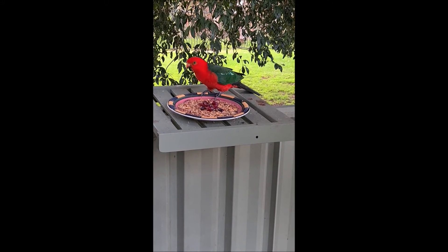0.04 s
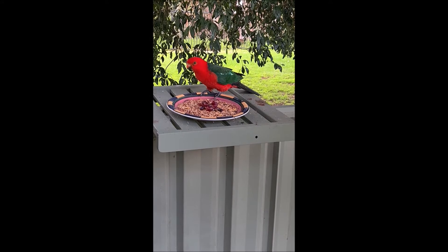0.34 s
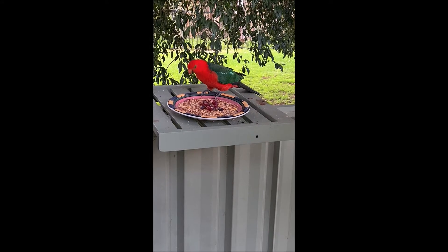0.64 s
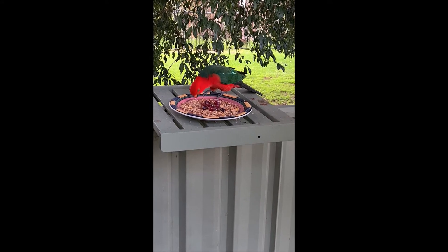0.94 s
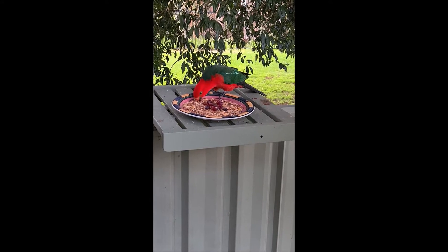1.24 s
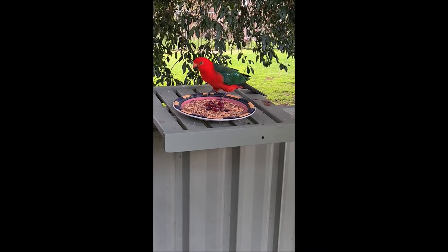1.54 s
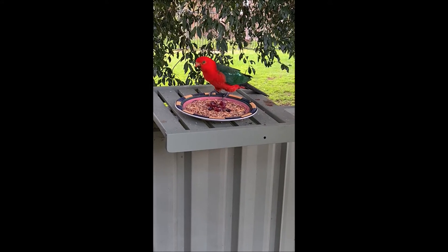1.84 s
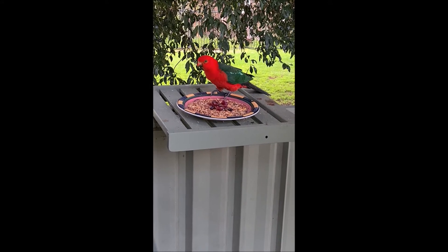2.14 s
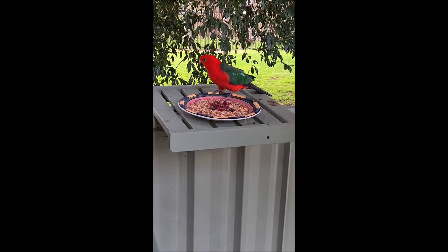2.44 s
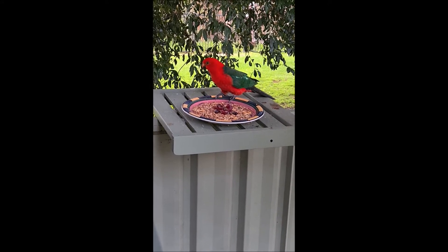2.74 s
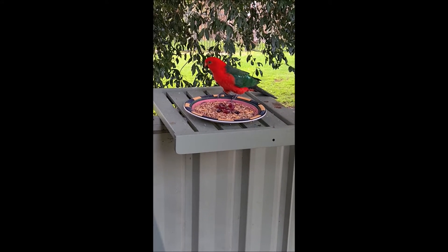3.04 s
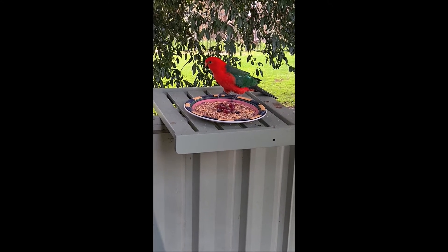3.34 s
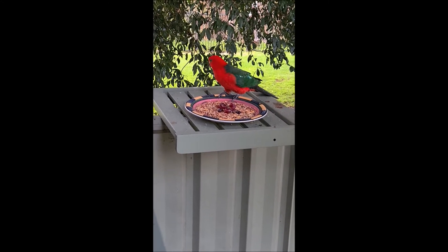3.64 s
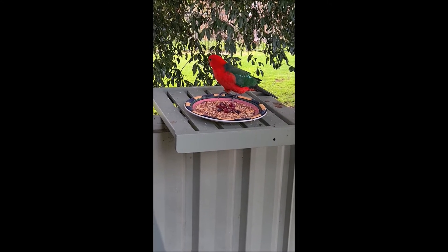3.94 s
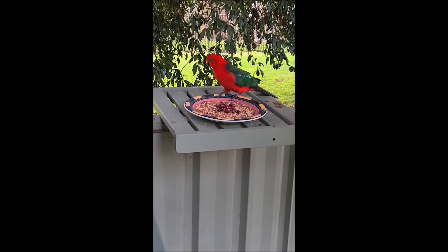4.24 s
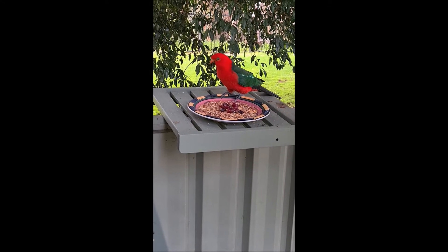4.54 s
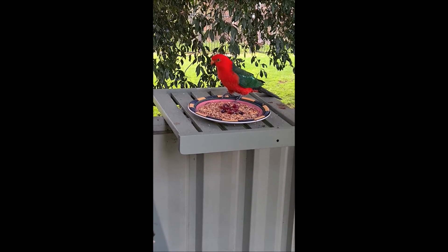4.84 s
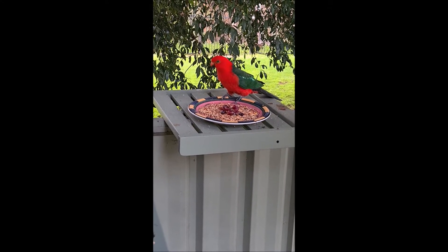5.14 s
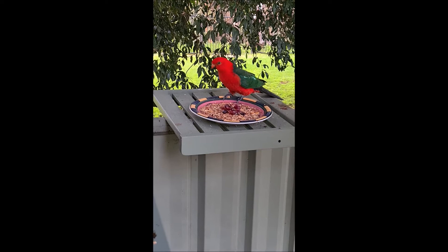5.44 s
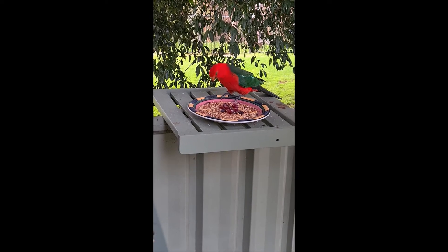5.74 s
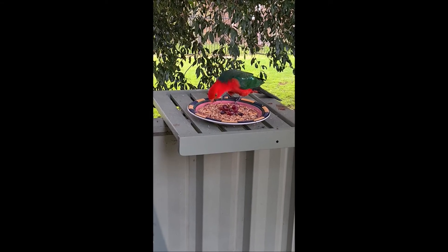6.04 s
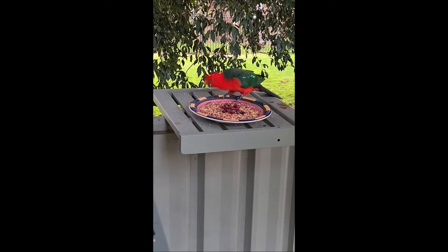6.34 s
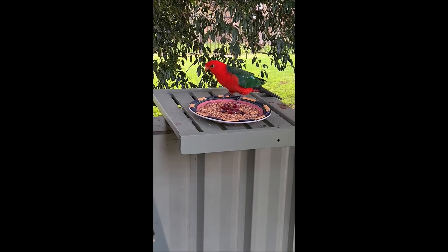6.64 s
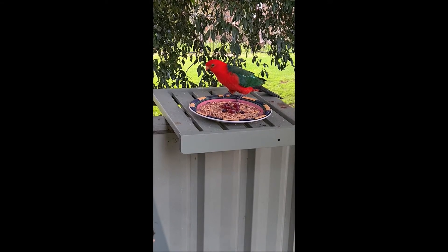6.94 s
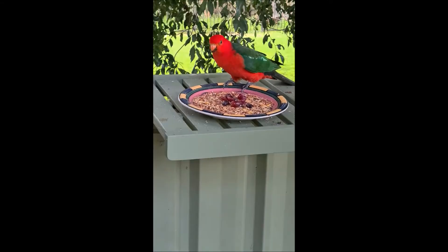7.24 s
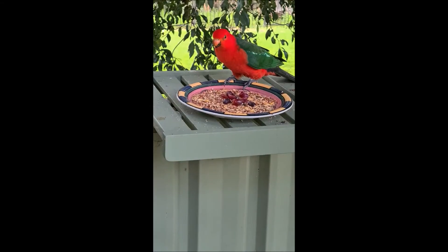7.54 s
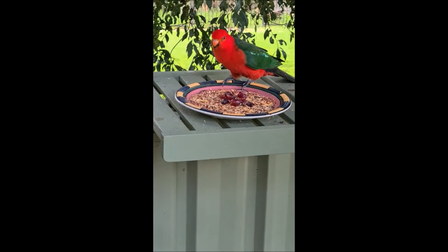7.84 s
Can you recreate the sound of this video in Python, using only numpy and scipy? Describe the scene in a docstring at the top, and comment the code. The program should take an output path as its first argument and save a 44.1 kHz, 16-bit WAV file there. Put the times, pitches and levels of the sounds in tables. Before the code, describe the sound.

A parrot cracks seed with sharp ticks while a few knocks ring on a metal roof and garden birds trill and chirp.

```python
"""A parrot on a veranda

A parrot cracks seed at a dish: each brittle fracture is a sharp tick, among a few rustles.
Something knocks on the sheet-metal roof four times, each weaker and duller, exciting its modes.
In the garden trees, the vibrating membranes of birds trill, screech and pip over a soft outdoor wash.
A dry tap and a few low bumps sound close to the microphone."""
import sys
import numpy as np
from scipy import signal
from scipy.fft import rfft, irfft, next_fast_len
from scipy.io import wavfile
from scipy.ndimage import uniform_filter1d

SR = 44100
rng = np.random.default_rng(int(sys.argv[2]) if len(sys.argv) > 2 else 0)


def to_wav(s):
    """Save 16-bit WAV."""
    ch = np.atleast_2d(s).T  # columns
    pcm = np.round(np.clip(ch, -1, 1) * 32767)  # PCM
    wavfile.write(sys.argv[1], SR, pcm.astype(np.int16))


N = 348390

# spectrum of a woody knock: frequency_hz, level_db
WOOD_SPECTRUM = [(150, -4), (700, -6.5), (1150, 2.5), (1700, -1.5), (2700, -1), (4000, -5), (8000, -32),
                 (16000, -24)]
# reverberation of the veranda: frequency_hz, t60_s
VERANDA_DECAY = [(150, 0.58), (1000, 0.24), (2500, 0.27), (6000, 0.26), (15000, 0.21)]
# reverberation of the garden: frequency_hz, t60_s
GARDEN_DECAY = [(500, 1), (2500, 0.59), (4000, 0.53), (8000, 0.52), (15000, 0.099)]


def amp(db):
    """Amplitude ratio of a level in decibels."""
    return 10 ** (np.asarray(db) / 20)


def unit(x):
    """Normalisation to rms 1."""
    return x / np.sqrt(np.mean(x ** 2) + 1e-20)


def read(points, hz):
    """Interpolation on a log-frequency axis."""
    frequency, value = np.transpose(points)
    return np.interp(np.log(hz + 1), np.log(frequency + 1), value)


def times(length_s):
    """Sample times over a duration."""
    return np.arange(max(int(length_s * SR), 16)) / SR


def add(mix, start_s, sound):
    """Superposition of a sound on the mix."""
    part = mix[..., max(round(start_s * SR), 0):][..., :sound.shape[-1]]
    part += sound[..., :part.shape[-1]]


def noise(spectrum, size, corner_hz=np.inf):
    """Filtered noise of rms 1, falling a further 12 dB an octave above a corner."""
    hz = np.fft.rfftfreq(size, 1 / SR)
    shaped = rfft(rng.standard_normal(size)) * amp(read(spectrum, hz))
    return unit(irfft(shaped / np.hypot(1, np.square(hz / corner_hz)), size))


def wobble(size, rate_hz):
    """Random modulation: low-pass noise of rms 1."""
    return noise([(1, 0), (2, 0.014)], size, rate_hz)


def click(gain, size=2048):
    """Minimum phase gives the sharpest causal pulse of a magnitude spectrum; its energy is 1."""
    log_gain = np.log(np.maximum(np.r_[gain, gain[-2:0:-1]], 1e-5))
    pulse = np.fft.ifft(np.exp(np.conj(signal.hilbert(log_gain)))).real[:size]
    return pulse / np.linalg.norm(pulse)


def swell(t, edge):
    """Cosine-tapered envelope; edge is the share spent rising and falling."""
    return signal.windows.tukey(len(t), np.clip(edge, 0, 1))


def place(x, t60s, direct_db, wet_db, lag_samples=8):
    """Direct sound reaches the left port first; the diffuse echoes differ at each port."""
    echoes = rng.choice([-1., 1.], (2, SR)) * (rng.random((2, SR)) < 1 / 10)
    hz, t, spectra = signal.stft(echoes, SR, nperseg=256)
    decay = np.exp(-np.log(1000) * t / read(t60s, hz)[:, None])
    tail = signal.istft(spectra * decay, SR, nperseg=256)[1]
    wet = signal.fftconvolve(np.atleast_2d(x), tail / np.linalg.norm(tail[0]), axes=1)[:, :N]
    left, right = np.broadcast_to(x, (2, N))
    return amp(direct_db) * np.array([left, np.roll(right, lag_samples)]) + amp(wet_db) * wet


def voice(hz, rough, jitter=0.0764, jitter_hz=700, flutter_db=2.0, drift=0.0055):
    """Phase and amplitude of a bird's membrane; fast frequency modulation is heard as roughness."""
    shaken_hz = hz * (1 + jitter * rough * wobble(len(hz), jitter_hz) + drift * wobble(len(hz), 33.6))
    strength = np.sqrt(2) * unit(amp(flutter_db * wobble(len(hz), 27)))
    return 2 * np.pi * np.cumsum(shaken_hz) / SR, strength


def tone(hz, rough, octave_db=-33):
    """A whistle: a fundamental with a faint second harmonic."""
    phase, strength = voice(hz, rough)
    return strength * (np.sin(phase) + amp(octave_db) * np.sin(2 * phase))


def arch(t, start, middle, end):
    """A parabolic pitch contour through three points."""
    return np.polyval(np.polyfit([0, 1 / 2, 1], [start, middle, end], 2), t / t[-1])


def glide(t, hz, octaves, arch_octaves=.035):
    """A slightly arched exponential sweep, passing hz at mid-call."""
    from_middle = t / t[-1] - 1 / 2
    return hz * 2 ** (octaves * from_middle - arch_octaves * (2 * from_middle) ** 2)


def chirp(length, hz, octaves, db, rough):
    """A swept tone that swells and fades."""
    t = times(length)
    return amp(db) * swell(t, 0.23) * tone(glide(t, hz, octaves), rough, octave_db=-22.5)


def air(level_db=-50, swell_db=1.57, swell_hz=0.59, patch_db=2.0):
    """Distant outdoor wash: drifting noise, coherent between the ports at long wavelengths."""
    # broad spectrum: frequency_hz, level_db
    spectrum = [(12, -31), (20, -6.5), (60, 0.5), (150, -11), (347, -9.5), (472, -14), (698, -7),
                (897, -13), (1120, -10), (1570, -20.5), (4060, -27), (7310, -36), (8890, -46.5),
                (12400, -43), (16000, -48)]
    # spectral peaks: centre_hz, width_hz, gain_db
    peaks = [(36.6, 27, 6), (648, 320, 2), (1060, 500, 1.5), (2030, 960, 6)]
    # likeness of the two ports: frequency_hz, coherence
    coherence = [(30, 1), (100, 0.99), (250, 0.96), (700, 0.69), (1200, 0.68), (3000, 0.058), (16000, 0.05)]
    # phase lead of the left port: frequency_hz, lead_rad
    lead = [(20, 0), (300, 0.55), (750, 0.56), (1200, 1.68), (2000, 2.5), (4000, 7), (16000, 0.5)]
    frames, hz = N // 512 + 5, np.fft.rfftfreq(2048, 1 / SR)
    draws = rng.standard_normal((5, frames, len(hz)))
    left, independent = draws[0] + 1j * draws[1], draws[2] + 1j * draws[3]
    patches = unit(uniform_filter1d(uniform_filter1d(draws[4], size=9, axis=0), size=16, axis=1))
    shared = np.clip(read(coherence, hz), -1, 1)
    right = (shared * left + np.sqrt(1 - shared ** 2) * independent) * np.exp(-1j * read(lead, hz))
    peaks_db = sum(db / (1 + (2 * (hz - centre) / width) ** 2) for centre, width, db in peaks)
    spectra = np.array([left, right]) * amp(read(spectrum, hz) + peaks_db + patch_db * patches)
    wash = signal.istft(spectra, nperseg=2048, noverlap=1536, time_axis=1, freq_axis=2)[1][:, :N]
    midband = signal.sosfilt(signal.butter(2, [300, 1400], "band", fs=SR, output="sos"), wash.mean(0))
    return wash / midband.std() * amp(level_db + swell_db * wobble(N, swell_hz))


def screeches():
    """Source and filter: the parrot's throat shapes the overtones of a falling call."""
    # screeches: start_s, length_s, pitch_hz, glide_octaves, fundamental_db, overtones_db, roughness
    calls = [(0, 0.25, 2245, -0.2, -54.5, -59, 0.88), (.489, 0.14, 2200, -0.075, -57.5, -52, 1.09),
             (0.877, .13, 1960, -0.024, -53, -50, 0.24), (1.528, 0.12, 2005, -.14, -58, -65.5, 0.14),
             (3.278, 0.17, 2188, -0.28, -55, -49.5, 0.35), (5.397, 0.073, 1942, -0.22, -43, -60, 0),
             (5.61, .12, 2180, -.19, -50.5, -65, .25), (5.726, 0.045, 1968, -.23, -44, -65, .2),
             (6.277, 0.069, 1640, -0.17, -51.5, -87, 0.04), (6.602, 0.21, 2133, -0.18, -57.5, -53, 0.5)]
    # response of the throat: frequency_hz, gain_db
    throat = [(3000, -15), (4300, -0.5), (6300, -0.5), (8500, -20), (13000, -22)]
    out = np.zeros(N)
    for s, length, hz, octaves, db, overtones_db, rough in calls:
        t = times(length)
        pitch = glide(t, hz, octaves)
        phase, strength = voice(pitch, rough)
        overtones = sum(amp(read(throat, k * pitch)) * np.sin(k * phase) for k in range(2, 7))
        harmonics = amp(db) * np.sin(phase) + amp(overtones_db) * overtones
        add(out, s, strength * swell(t, 0.28) * harmonics)
    return out


def chatter(count=20, centre_hz=2900, spread_octaves=.35, level_db=-63, spread_db=3):
    """Small birds further off: faint swept tones, random in onset, pitch and slope."""
    out = np.zeros(N)
    for k, (when, pitch, slide, level) in enumerate(rng.uniform(-1, 1, (count, 4))):
        s = (k + (1 + when) / 2) / count * N / SR
        hz = centre_hz * 2 ** (spread_octaves * pitch)
        add(out, s, chirp(.12, hz, .2 * slide, level_db + spread_db * level, rough=.6))
    return out


def garden_birds(whine_lower_hz=2751, lisp_hz=7140):
    """Frequency-modulated calls and squawks of band noise, scattered together by the trees."""
    # nearer chirps: start_s, length_s, pitch_hz, glide_octaves, level_db, roughness
    chirps = [(0.272, 0.049, 4770, .05, -52, .9), (1.346, 0.058, 3350, .05, -52, 1.1),
              (1.865, 0.071, 3450, .14, -49, 1), (2.668, 0.076, 5830, 0.36, -53.5, 0.73),
              (2.743, 0.068, 6130, -0.27, -41, 0.63), (2.8, .18, 5600, -.08, -59, 0.42),
              (4.771, 0.096, 3210, -.26, -48, 1.05), (5.373, 0.0455, 3420, -0.085, -48.5, .5),
              (5.374, 0.047, 6230, -0.15, -44, 0.7), (5.504, .078, 2795, -0.22, -50.5, 0.7),
              (6.095, 0.079, 4850, .03, -53.5, 0.6), (6.459, 0.25, 2466, -.1, -55.5, 1.12),
              (6.903, 0.13, 3150, -0.29, -50.5, .54), (7.113, .1, 5750, -0.054, -52.5, 0.36),
              (7.708, 0.086, 4450, -0.082, -49.5, 0.23)]
    # far low calls: start_s, length_s, pitch_hz, glide_octaves, level_db
    far_calls = [(1.076, 0.056, 721, -0.0082, -50.5), (4.098, 0.17, 765, 0.036, -51.5),
                 (4.664, .26, 724, -0.281, -53.5), (5.366, 0.13, 705, -0.04, -45.5),
                 (7.119, .13, 1123, -0.0094, -54.5)]
    # thin, hissing calls: start_s, length_s, level_db
    lisps = [(1.147, .12, -63.5), (3.667, 0.1, -55), (5.436, .13, -59.5), (7.37, 0.2, -62)]
    # harsh squawks: start_s, length_s, centre_hz, level_db
    squawks = [(5.337, 0.03, 2400, -35.5), (6.788, 0.042, 3460, -44), (7.015, 0.021, 3300, -47),
               (7.765, 0.032, 3270, -48.5)]
    # two-voiced whines: start_s, length_s, upper_pitch_hz, level_db
    whines = [(6.61, 0.19, 4540, -48), (6.859, 0.16, 4260, -45.5), (7.601, 0.131, 4350, -50.5),
              (7.856, .08, 4200, -49.5)]
    # reverberation among the trees: frequency_hz, t60_s
    tree_decay = [(500, 0.16), (2500, 0.33), (4000, 0.39), (8000, 0.3), (15000, 0.15)]
    out = screeches() + chatter()
    for s, *note in chirps:
        add(out, s, chirp(*note))
    for s, length, hz, db in whines:
        add(out, s, chirp(length, hz, 0.046, db, rough=0.246))
        add(out, s, chirp(length, whine_lower_hz, 0, db - 5, rough=0.246))
    for s, length, db in lisps:
        add(out, s, chirp(length, lisp_hz, 0, db, rough=0.95))
    for s, *note in far_calls:
        add(out, s, chirp(*note, rough=0.031))
    for s, length, hz, db in squawks:
        t = times(length)
        band = [(hz / 4, -22), (hz, 0), (hz * 1.25, -2), (hz * 2.37, -24), (hz * 5, -50)]
        add(out, s, amp(db) * swell(t, 0.39) * noise(band, len(t)))
    return place(out, tree_decay, direct_db=-6.5, wet_db=-1, lag_samples=4)


def seed_cracks(snap_hz=8000, half_width_hz=1000, snap_db=4, crumble_db=-19, crumble_s=0.00041):
    """Brittle fracture: an impulse and a short crumbling excite a bright snap and a woody knock."""
    # beak cracking seed: start_s, level_db, body_db, corner_hz
    cracks = [(0.2273, -27, -6, 18000), (.46, -52, -10, 16000), (.94, -44, -6, 12000),
              (1.155, -48.5, -9, 14000), (2.774, -38.5, -21, 8900), (4.296, -49, -15, 8000),
              (4.581, -43.5, -10, 17000), (6.8065, -25, -3.5, 16100), (7.5308, -26, -18, 7300),
              (7.6879, -40.5, -1, 8000)]
    # spectrum of a snapping husk: frequency_hz, level_db
    husk = [(500, -61), (2000, -3), (4000, -1.5), (6000, 11), (8000, 12), (10000, 4), (16000, 9)]
    # early reflections from ledge and walls: frequency_hz, t60_s
    wall_decay = [(300, 0.057), (3000, 0.073), (15000, 0.088)]
    out, hz, t = np.zeros(N), np.fft.rfftfreq(4096, 1 / SR), times(.03)
    resonance = 1 + amp(snap_db) / (1 + ((hz - snap_hz) / half_width_hz) ** 2)
    knock = click(amp(read(WOOD_SPECTRUM, hz)))
    for s, db, body_db, corner_hz in cracks:
        snap = click(amp(read(husk, hz)) * resonance / np.hypot(1, (hz / corner_hz) ** 3))
        force = (t == 0) + amp(crumble_db) * rng.standard_normal(len(t)) * np.exp(-t / crumble_s)
        add(out, s, amp(db) * signal.fftconvolve(force, snap + amp(body_db) * knock))
    early = place(out, wall_decay, direct_db=10.5, wet_db=17.5, lag_samples=6)
    return early + place(out, VERANDA_DECAY, direct_db=6, wet_db=13.5, lag_samples=6)


def rustles(grain_db=-1.5, body_db=-1.5):
    """Friction noise of feathers and leaves, made grainy by fast amplitude modulation."""
    # swishes: start_s, length_s, level_db
    swishes = [(0.233, 0.046, -55.5), (0.499, 0.22, -76), (3.209, 0.048, -55.5), (3.706, 0.042, -53.5),
               (3.833, 0.09, -44), (4.021, 0.074, -49.5), (4.125, 0.059, -50), (5.132, 0.037, -53),
               (5.992, 0.027, -60.5), (7.045, .059, -63), (7.59, .038, -60), (7.785, 0.06, -57.5)]
    # spectrum of rubbing feathers: frequency_hz, level_db
    feather = [(300, -39), (2000, -26), (5500, -6), (7000, -4), (8600, -9.5), (11000, -6.5), (16000, -10.5)]
    out = np.zeros(N)
    for s, length, db in swishes:
        t = times(length)
        hiss = noise(feather, len(t)) + amp(body_db) * noise(WOOD_SPECTRUM, len(t))
        add(out, s, amp(db) * swell(t, 0.37) * hiss * amp(grain_db * wobble(len(t), 500)))
    return place(out, VERANDA_DECAY, direct_db=1.5, wet_db=3.5)


def trills(buzz_hz=350, under_db=2, over_db=-11, flick_db=-2, octave_db=-33):
    """Biphonation: one side of the syrinx buzzes a high note while the other holds a lower one."""
    # one bird's trills: start_s, upper_db, lower_db, roughness, pitch_hz
    calls = [(0.548, -54.5, -58.5, 0.34, 4015), (1.42, -54.5, -59.5, 0.11, 3970),
             (2.291, -55, -57, 0.18, 3955), (3.22, -55, -56.5, 0.26, 3950), (4.106, -55, -57.5, 0.14, 3928),
             (4.971, -50, -52.5, 0.01, 3917), (6.002, -44.5, -53, 0.11, 3895),
             (7.079, -47.5, -52, 0.15, 3930)]
    # contour of the upper voice: time_s, pitch_ratio, level_db
    upper_contour = [(0, .985, 1), (.022, 1, 1), (.055, .993, 0), (.1, 1, 0), (.17, 1.003, 0),
                     (.195, 1, -11), (.24, .997, -15)]
    # contour of the lower voice: time_s, pitch_hz, level_db
    lower_contour = [(0, 2720, -9), (.12, 2730, -5), (.165, 2690, -8), (.19, 2590, 2), (.25, 2560, 4)]
    out = np.zeros(N)
    for s, upper_db, lower_db, rough, pitch_hz in calls:
        at, bend, level_db = np.transpose(upper_contour)
        t = times(at[-1])
        phase, strength = voice(pitch_hz * np.interp(t, at, bend), rough)
        buzz, depth = voice(np.full(len(t), buzz_hz), rough)
        sidebands = amp(under_db) * np.sin(phase - buzz) + amp(over_db) * np.sin(phase + buzz)
        upper = np.sin(phase) + unit(depth) * sidebands + amp(octave_db) * np.sin(2 * phase - buzz)
        add(out, s, amp(upper_db + np.interp(t, at, level_db)) * unit(upper * strength) * swell(t, .09))
        at, hz, level_db = np.transpose(lower_contour)
        t = times(at[-1])
        lower = tone(np.interp(t, at, hz), rough=0.13)
        add(out, s, amp(lower_db + np.interp(t, at, level_db)) * lower * swell(t, 0.087))
        t = times(0.027)
        flick = tone(arch(t, 4000, 3300, 2700), rough=1)
        add(out, s + .238, amp(lower_db + flick_db) * flick * swell(t, .8))
    return place(out, GARDEN_DECAY, direct_db=6.0, wet_db=-0.5, lag_samples=10) * amp([[-1], [1]])


def roof_knocks(rattle_t60_s=0.15, rise_s=0.0019, grain_db=2, far_mode_db=-11, spot_octaves=0.25):
    """A struck plate rattles and rings in damped modes, loudest in those the struck spot favours."""
    # impacts, most in close pairs:
    # start_s, level_db, rattle_s, corner_hz, fizz_db, ring_db, favoured_hz, thud_db
    impacts = [(1.973, -19.5, 0.039, 4440, -8, -3, 1300, -8),
               (2.3221, -22.5, 0.036, 2100, -27.5, 2.5, 1020, -15.5),
               (2.362, -24.5, 0.004, 7300, -13, -26, 1800, -27),
               (2.539, -32, 0.017, 1880, -35, 6.5, 1190, -22),
               (2.562, -38.5, 0.034, 2080, -46, 5, 1330, -26), (2.724, -40, 0.0038, 1400, -24, 5, 1130, -8),
               (2.754, -45, 0.051, 1900, -18, -10, 1190, -17)]
    # spectrum of the rattling sheet: frequency_hz, level_db
    sheet = [(60, -45), (150, -17), (220, -13), (450, -17.5), (700, 0), (950, 1.5), (1250, 5), (1900, 5.5),
             (2900, 4.5), (4000, -2.5), (6000, -7.5), (8500, -7), (15000, -32)]
    # spectrum of its loose edges buzzing: frequency_hz, level_db
    fizz = [(2000, -2), (5000, 8.5), (7000, 4.5), (8600, -4), (11000, 3.5), (16000, -5)]
    # spectrum of the thud: frequency_hz, level_db
    thud_spectrum = [(60, -32), (170, -5), (400, 1.5), (800, -4), (2000, -37), (16000, -74)]
    # modes of the roof: frequency_hz, level_db, t60_s
    modes = [(690, -9, .25), (954, -9, .15), (1141, 0, .17), (1185, -6, .1), (1265, -7, .18),
             (1328, -6, .18), (1520, -9, .2), (1696, -7, .18), (1803, -7, .25), (2137, -5, .28),
             (2493, -8, .2), (2613, -6, .16), (2902, -7, .18)]
    out, t = np.zeros((2, N)), times(1 / 2)
    size, onset = len(t), 1 - np.exp(-t / rise_s)
    for s, db, rattle_s, corner_hz, fizz_db, ring_db, favoured_hz, thud_db in impacts:
        envelope = np.exp(-np.log(1000) * np.maximum(t - rattle_s, 0) / rattle_t60_s)
        shake = envelope * amp(grain_db * wobble(size, 180))
        rattle = np.array([noise(sheet, size, corner_hz) + amp(fizz_db) * noise(fizz, size)
                           for port in range(2)])
        strike = noise(sheet, size, corner_hz) * np.exp(-t / 0.0036)
        thud = amp(thud_db) * noise(thud_spectrum, size) * np.exp(-t / 0.02)
        ring = 0
        for hz, mode_db, t60 in modes:
            mismatch = 1 - np.exp(-(np.log2(hz / favoured_hz) / spot_octaves) ** 2)
            mode = np.exp(-np.log(1000) * t / t60) * np.sin(2 * np.pi * (hz * t + rng.random()))
            ring += amp(mode_db + far_mode_db * mismatch) * mode
        add(out, s, amp(db) * onset * (rattle * shake + strike + thud + 2 * amp(ring_db) * ring))
    return place(out, VERANDA_DECAY, direct_db=2, wet_db=-6, lag_samples=9)


def pips(start_s=2.318, period_s=.1226, slowing_s=.018, length_s=.03, level_db=-46.5, fade_db_per_s=1.44):
    """A far bird's pulse train of falling sweeps; it fades, and its period lengthens at the end."""
    out, t, s = np.zeros(N), times(length_s), start_s
    for to_come in reversed(range(23)):
        db = level_db - fade_db_per_s * (s - start_s) + rng.uniform(-1.2, 1)
        note = tone(arch(t, 2340, 2100, 1850), rough=.04, octave_db=-37)
        add(out, s - length_s / 4, amp(db) * swell(t, 0.29) * note)
        s += period_s + slowing_s * np.exp((1 - to_come) / 1.6)
    return place(out, GARDEN_DECAY, direct_db=-3.5, wet_db=-2, lag_samples=5) * amp([[-1], [1]])


def handling():
    """A tap and soft low bumps in the direct field, too near for any echo to count."""
    # dry tap by the microphone: start_s, level_db
    taps = [(4.986, -31)]
    # bumps on the microphone: start_s, length_s, pitch_hz, level_db
    bumps = [(4.198, 0.046, 61.6, -49), (5.385, 0.068, 83, -36.5), (5.451, 0.052, 92, -40)]
    out = np.zeros(N)
    for s, db in taps:
        t = times(0.029)
        add(out, s, amp(db) * noise(WOOD_SPECTRUM, len(t)) * np.exp(-t / 0.0016))
    for s, length, hz, db in bumps:
        t = times(length)
        add(out, s, amp(db) * np.sqrt(2) * swell(t, 0.43) * np.sin(2 * np.pi * hz * t))
    return out


def scene():
    """Superposition of all the sources heard from the veranda."""
    near = roof_knocks() + seed_cracks() + handling() + rustles()
    return near + trills() + garden_birds() + pips() + air()


def record(dry):
    """Frequency response of the microphone: the right port is brighter, and both are band-limited."""
    # excess of the right port over the left: frequency_hz, gain_db
    right_excess = [(30, 1.5), (600, -0.1), (1200, 2), (2200, 2), (6000, 5.5), (14000, 5.5)]
    size, cutoff_hz = next_fast_len(N + 2048), 15950
    lean_db = read(right_excess, np.fft.rfftfreq(size, 1 / SR)) / 2
    heard = irfft(rfft(dry, size) * amp([-lean_db, lean_db]), size)[:, :N]
    lowpass = signal.firwin(511, cutoff_hz, window=("kaiser", 9), fs=SR)
    return signal.oaconvolve(heard, lowpass[None], "same")


dry = scene()
out = record(dry)
to_wav(out)
```